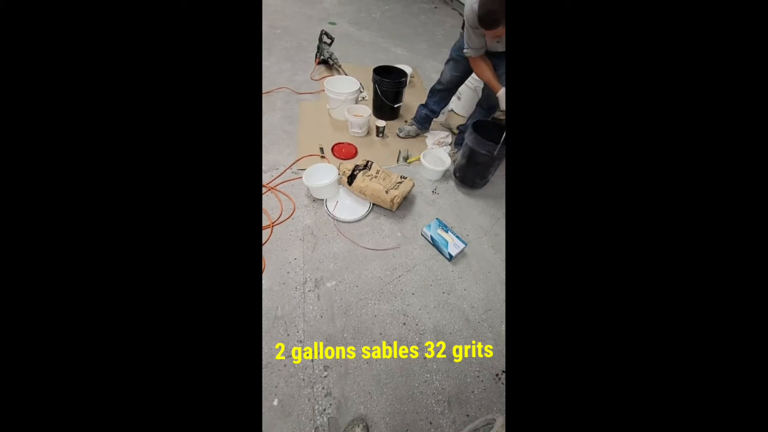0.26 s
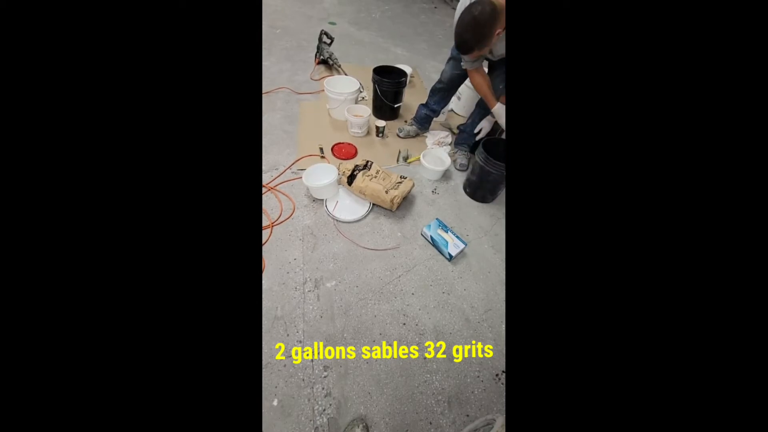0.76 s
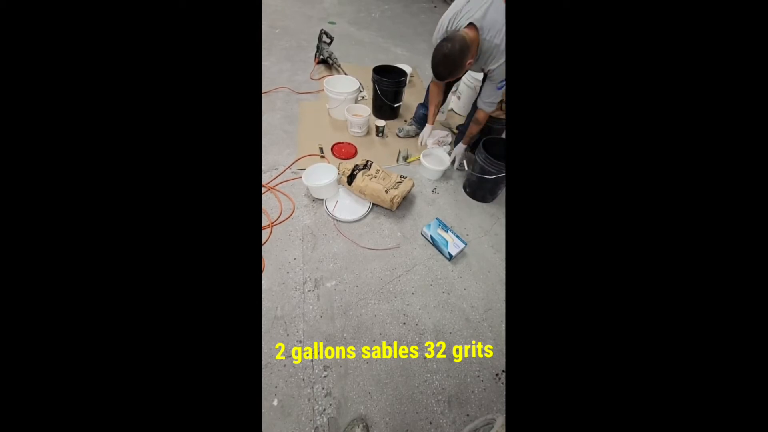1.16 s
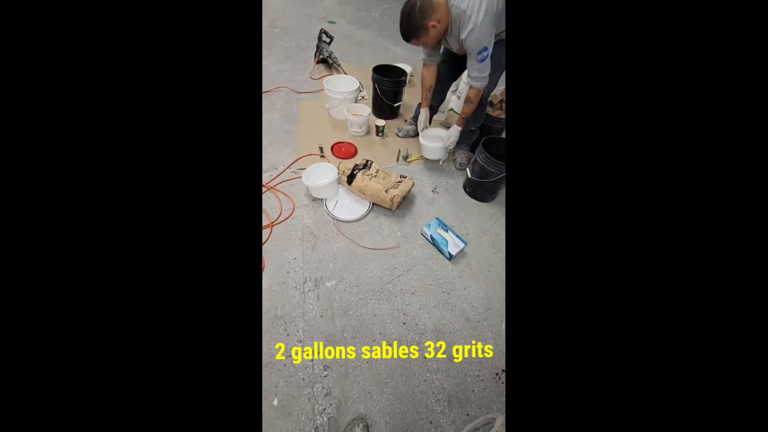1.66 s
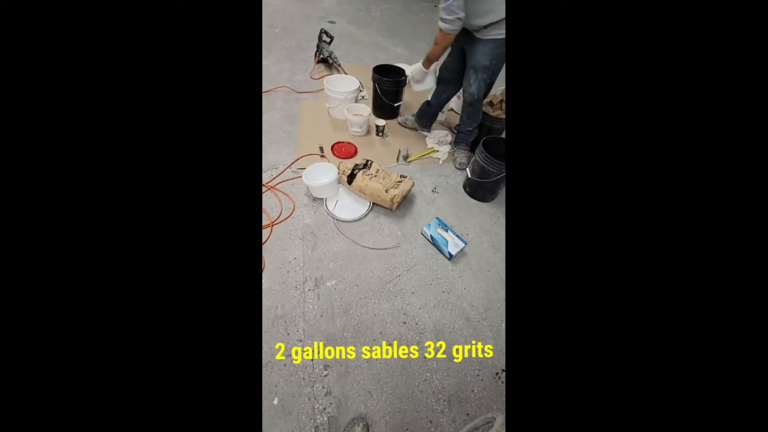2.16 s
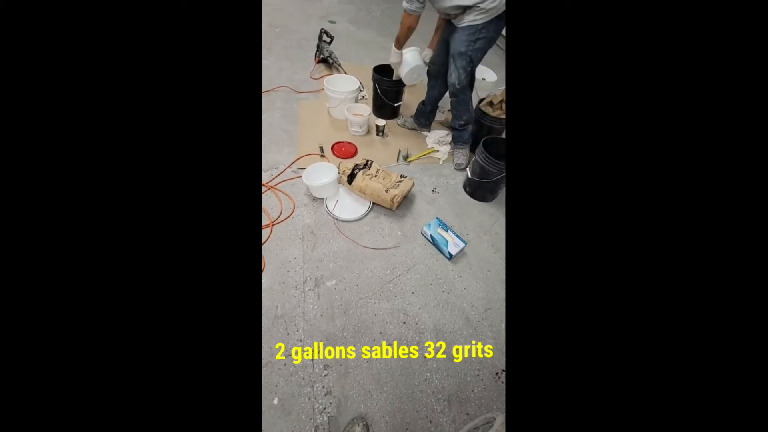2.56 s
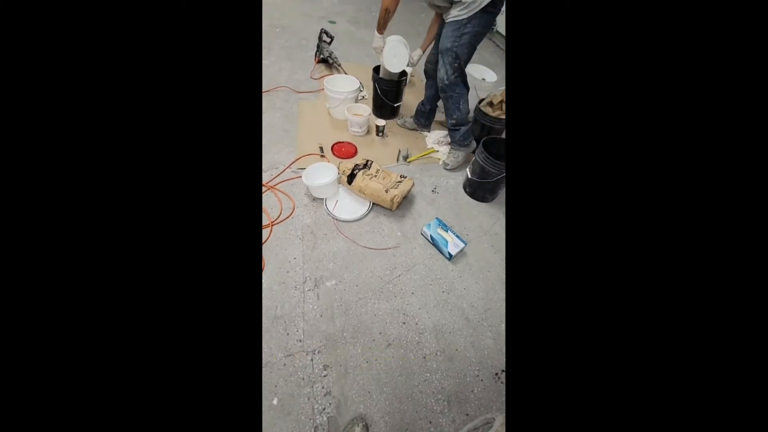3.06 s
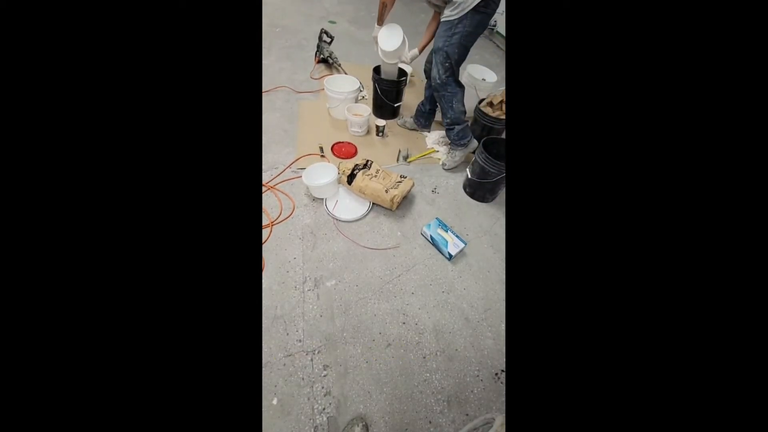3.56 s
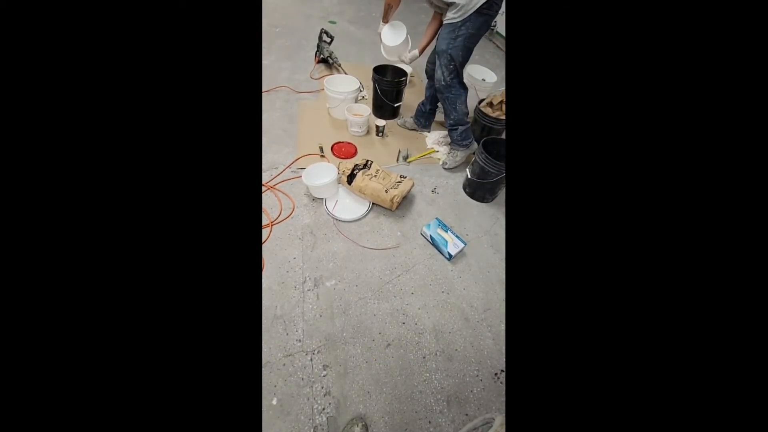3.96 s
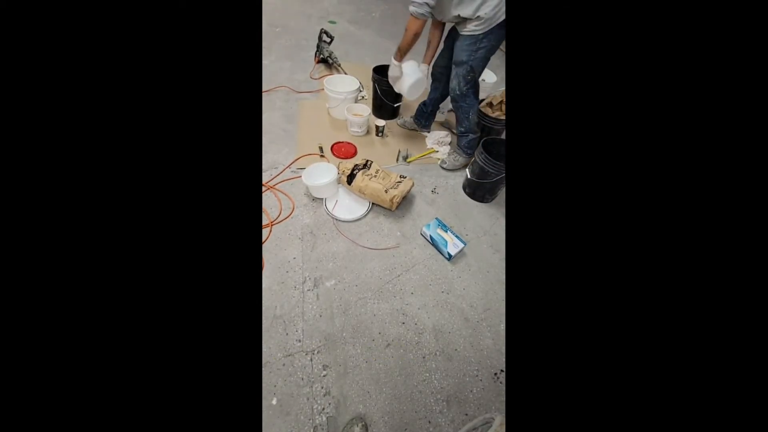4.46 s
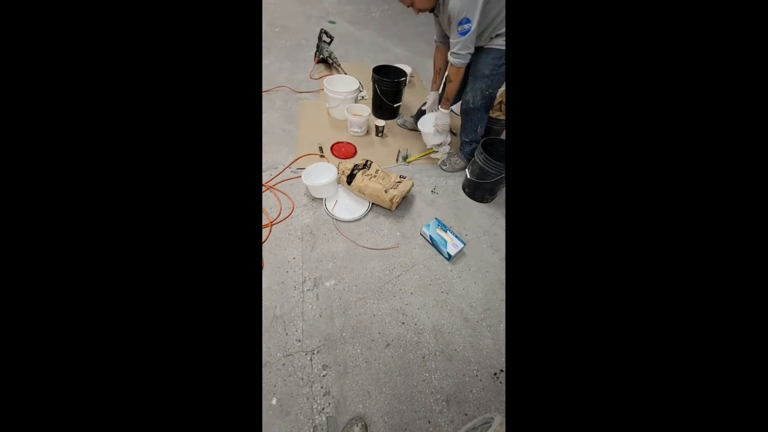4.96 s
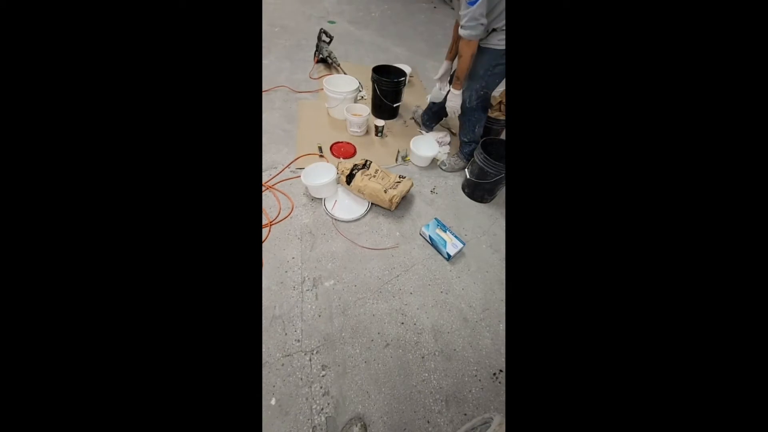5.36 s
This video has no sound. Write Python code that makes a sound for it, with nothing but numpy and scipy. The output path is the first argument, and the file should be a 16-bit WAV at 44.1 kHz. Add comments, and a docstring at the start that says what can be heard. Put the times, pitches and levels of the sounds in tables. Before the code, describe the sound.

In a reverberant concrete garage with low rumble and faint lamp hum, feet and plastic scuff, a heavy bucket thumps down and rocks, and its handle clacks several times. After a brief scrape, dry sand hisses into a tall bucket in two surges. A quiet gap follows, then the empty pail clatters onto the floor. Stereo microphones at a distance hear mostly room.

```python
"""In a large concrete garage a heavy plastic bucket is set down and its handle clacks on the rim.
A small pail of dry sand is tipped into a tall bucket in two surges and dropped on the floor; shoes step and scuff.
Blows excite resonant modes, sand and scrapes are streams of random tiny impacts, and lamps hum over a low rumble.
Two spaced microphones hear mostly the room: direct sound, a few strong echoes and a dense diffuse tail."""
import sys
import numpy as np
from scipy import signal
from scipy.fft import rfft, irfft
from scipy.io import wavfile
from scipy.ndimage import uniform_filter1d

SR = 44100
rng = np.random.default_rng(int(sys.argv[2]) if len(sys.argv) > 2 else 0)


def wrap_up_sound(samples):
    """Save the sound to the file named by the first command line argument, as 16-bit audio."""
    columns = np.atleast_2d(samples).T
    # keep every value between -1 and 1, then stretch to whole-number steps
    tamed = np.clip(columns, -1, 1)
    steps = np.round(tamed * 32767).astype(np.int16)
    wavfile.write(sys.argv[1], SR, steps)


N = 247753

# Source levels are those before the room and the left-right balance.
# Blows: (time [s], ring level [dB], crack level over the ring [dB], hardness [dB per octave])
BUCKET_THUMPS = [(0.563, 9, -37.5, -0.5), (0.573, 8.5, -41.5, -5), (0.73, 6.5, -33.5, -10.5),
                 (0.806, 4, -44, -4)]  # the heavy bucket meets the floor and rocks
HANDLE_CLACKS = [(0.722, -33, -11, 4.5), (0.8215, -6, -11.5, -5), (1.1397, 7.5, -11.5, -1.3),
                 (1.4274, 0.5, -10, -2.5), (1.5946, -10.5, -10, -3.3), (1.6828, -27, -3, -7),
                 (1.9294, -37.5, -2.5, 14)]  # the handle and rim knock
PAIL_BOUNCES = [(5.134, -25.5, -22, 20), (5.146, -9.5, -11.5, -3.5), (5.151, -1, -7.5, 7.5),
                (5.163, 5, -1.5, -2), (5.254, 4.5, -21, 2), (5.266, -4, -24, -1), (5.33, -16, -30, -3),
                (5.39, -10, -19, 6), (5.525, -27, -10, 15)]  # the empty pail lands and bounces
FOOTFALLS = [(0.174, -11, -41, 4), (0.203, -19, -32, -3), (2.276, -18, -21, -1)]  # soft footfalls on the concrete
# Ticks and short knocks of the pail:
# (time [s], level [dB], pitch [Hz], click level over the ring [dB], cycles to fall 60 dB [count])
PAIL_TICKS = [(2.588, -49.5, 2000, -24, 9.9), (2.647, -44, 1200, -6, 16), (2.762, -50, 2280, -35, 9.4),
              (2.821, -37.5, 750, -2, 19), (3.5, -33, 2500, -30, 6.7), (4.06, -56.5, 6050, 6, 14),
              (4.165, -49, 1443, 3, 13), (4.222, -49, 3860, -11, 25), (4.344, -46, 3450, -12, 16),
              (4.347, -59, 1170, -20, 50), (5.2555, -15, 602, -31, 10.3)]
# The loaded bottom of the bucket booms as the weight settles: (time [s], swell [s], peak level [dB])
BUCKET_BOOMS = [(0.5653, 0.021, -4), (.728, .012, -20), (0.8166, 0.0057, -13.5)]
BOOM_HZ, BOOM_DECAY_S = 233, 0.0086

# Resonant modes of each body: (frequency [Hz], width [Hz], relative level [dB])
BUCKET_MODES = [(102, 24, -12), (198, 29, -0.5), (220, 50, 3), (262, 160, 2), (368.5, 100, -10),
                (531, 150, -13.5), (715, 77, -22.5), (1039, 364, -6), (1567, 136, -14), (1985, 200, -28.5)]
HANDLE_MODES = [(196.6, 120, -12), (497.5, 840, -5), (774, 81, -2), (1077, 180, 2.5), (1354, 200, 3),
                (1763, 960, -1), (2300, 380, -5.5), (2630, 150, 3.5), (2960, 170, 0), (2928, 182, 7.5),
                (3070, 160, -1)]
PAIL_MODES = [(98, 27.8, -5.5), (180, 32, -9), (290, 30, -6), (356.3, 23, 8), (508, 35, 1), (705, 300, -13),
              (1120, 190, -14.5), (1710, 260, -28), (1960, 160, -41), (2670, 990, -31.5)]
SHOE_MODES = [(106.9, 61, -12), (211, 40, 1), (344.7, 150, -5), (478, 300, -7), (652.6, 140, -11.5),
              (1600, 1700, -27.5)]
HOLLOW_MODES = [(725, 190, -0.5), (595, 220, -10), (1330, 40, -8)]  # the hollow of the tipped pail
# Spectra of contact cracks and rubbed sounds: (frequency [Hz], relative level [dB per Hz])
BUCKET_CRACK = [(2000, -12), (3500, 3), (4300, -3.5), (6200, -8), (8000, -6.5), (10500, -7), (12500, -5.5),
                (14000, -3.5), (15500, -16.5)]  # heavy bucket and handle
PAIL_CRACK = [(880, -23), (1500, -1), (1880, 1), (2670, -7.5), (2920, -10), (6190, -10), (8790, -16.5),
              (12300, -16.5), (15500, -22)]  # pail and shoe soles
SAND_COLOUR = [(350, -31), (600, -7), (678, -26), (756, -10.5), (915, -16.5), (1180, -4.5), (1430, -8),
               (2680, -1), (3380, -2), (5220, -6.5), (6950, -9.5), (10400, -20.5), (13200, -15),
               (15500, -18)]
SCRAPE_COLOUR = [(120, -57.5), (200, -3.5), (242, -34), (265, -20.5), (367, -16), (461, -5.5), (700, -6.5),
                 (1590, -3), (5000, -90), (6500, -94), (11000, -120)]

# The stream from the tipped pail, two surges: (time [s], level [dB], fizz level over the flow [dB])
POUR = [(2.56, -71, -3), (2.64, -69.5, 11), (2.79, -65.5, 7.5), (2.85, -54, 5), (2.92, -51, 5),
        (3.08, -54, 3.5), (3.33, -58.5, 3), (3.46, -53.5, 3.5), (3.51, -49.5, 1.5), (3.76, -57.5, 4.5),
        (3.95, -98, 6)]
# Loose grains spill: (start [s], hold [s], level [dB], fizz level over the flow [dB])
SPILLS = [(0.0, .15, -60, 4.5), (0.164, 0.0071, -55.5, 7.5), (.3, .1, -83, 9), (1.954, 0.16, -67.5, 3),
          (2.323, 0.34, -72.5, 2), (4.048, 0.11, -76, -1), (4.226, 0.007, -72.5, -14),
          (4.34, 0.014, -73, -13), (4.46, 0.069, -76.5, -11.5)]
SPILL_RISE_S, SPILL_FALL_DB_PER_S = 0.011, 400.5
# Sand slips in the hollow of the tipped pail: (start [s], hold [s], level [dB])
SLIPS = [(2.68, 0.012, -55), (2.755, 0.0099, -52.5), (2.82, .03, -53.5), (2.93, 0.05, -56.5),
         (3.82, .02, -62.5), (4.69, 0.1, -65.5), (4.88, 0.11, -68)]
SLIP_RISE_S, SLIP_FALL_DB_PER_S = 0.12, 206
# Plastic and shoes scrape the floor: (start [s], hold [s], level [dB])
SCRAPES = [(0.0, 0.18, -59.5), (.175, .008, -52), (.28, 0.029, -71), (1.6, 0.037, -37.5),
           (1.685, 0.055, -55), (2.05, 0.21, -66.5), (4.0, 0.097, -73), (4.155, .04, -83),
           (4.7, 0.27, -78.5), (5.145, .005, -43)]
SCRAPE_RISE_S, SCRAPE_FALL_DB_PER_S = 0.03, 255.5

# Extra top octave carried by the direct path alone: one row per port, left then right (level [dB])
BEAM_DB = [
    [5.0],
    [-8.0],
]
# Early echoes from floor, ceiling and walls: (delay [s], relative level [dB])
ECHOES = [(.0055, -3.5), (0.0126, 3.5), (.01356, -3), (0.0226, 2), (0.026, -12), (0.037, -7)]
# Decay of the diffuse tail: (frequency [Hz], time to fall 60 dB [s])
DECAY_TIMES = [(60, 0.76), (250, 1.19), (700, 1.21), (1500, 1), (3000, 0.91), (6000, 0.74), (9000, 0.61),
               (14000, 0.54)]
# Colour of the diffuse tail: (frequency [Hz], relative level [dB])
TAIL_COLOUR = [(60, -1), (250, 0.5), (700, 3), (1500, 2.1), (3000, 1), (6000, 2.5), (9000, -3.5),
               (12000, -6)]
# Left-right likeness of diffuse sound: (frequency [Hz], correlation [-1 to 1])
LIKENESS = [(60, 1), (120, 1), (240, 0.85), (480, -0.19), (950, -0.41), (1890, -0.28), (3770, -0.045),
            (7520, 0.13), (15000, -0.18)]
RIGHT_LAG_S = 0.00034  # the right port hears direct sound and echoes later

# Hum of the lamps: (frequency [Hz], mean level before waver and balance [dB rms])
LAMP_HUM = [(120, -69.5), (240, -60), (360, -68), (480, -76)]
# Rumble and hiss of the building: (frequency [Hz], relative level [dB per Hz])
AIR_COLOUR = [(12, -57), (20, -6.5), (112, 4.5), (185, -10.5), (238, -5), (289, -10), (362, -7.5),
              (416, -11.5), (1500, -25.5), (2840, -28.5), (10500, -44.5), (13900, -38.5), (15500, -53.5)]
AIR_DB = -54  # rms level before the left-right balance
BAND_EDGE_HZ = 15500


def sand():
    """Granular flow: landing, sliding and scraping impacts add as independent random sources."""
    hz, t = np.fft.rfftfreq(N, 1 / SR), np.arange(N) / SR
    return landing_sand(hz, t) + sliding_sand(hz, t) + scraping(hz, t)


def landing_sand(hz, t):
    """Superposed impacts: countless grains land in uneven lumps, the finest fizzing in the top octave."""
    colour = gain_of(read(SAND_COLOUR, hz))
    top = 1 / (1 + (8500 / (hz + 1)) ** 6)
    coarse_db, fizz_db = flow_db(t, 0), flow_db(t, 1)
    noise = rng.standard_normal(N)
    lumps_db = 1.5 * evened(uniform_filter1d(uniform_filter1d(noise, size=900), size=900))
    coarse = rubbed(colour * (1 - top), coarse_db + lumps_db, per_s=20000, spread_db=3)
    fizz = rubbed(colour * top, fizz_db, per_s=29000, spread_db=2.9)
    return coarse + fizz


def flow_db(t, fizz_share):
    """Flow envelope: the stronger of pour and spills sets the level; fizz_share 1 adds the fizz offset."""
    when, pour_db, fizz_db = np.transpose(POUR)
    pour = np.interp(t, when, pour_db + fizz_share * fizz_db, -120, -120)
    strokes = [(s, hold, db + fizz_share * fizz) for s, hold, db, fizz in SPILLS]
    return np.maximum(pour, strokes_db(strokes, t, SPILL_RISE_S, SPILL_FALL_DB_PER_S))


def sliding_sand(hz, t):
    """Cavity resonance: slipping grains excite the modes of the tipped pail's hollow."""
    level_db = strokes_db(SLIPS, t, SLIP_RISE_S, SLIP_FALL_DB_PER_S)
    return rubbed(modes(HOLLOW_MODES, hz), level_db, per_s=3000, spread_db=3)


def scraping(hz, t):
    """Friction as a train of micro-impacts: plastic and shoes rub over the floor."""
    level_db = strokes_db(SCRAPES, t, SCRAPE_RISE_S, SCRAPE_FALL_DB_PER_S)
    return rubbed(gain_of(read(SCRAPE_COLOUR, hz)), level_db, per_s=3200, spread_db=3)


def rubbed(response, level_db, per_s, spread_db):
    """Filtered impulse noise: random grains take the colour of a response and follow a level curve."""
    coloured = irfft(rfft(grains(per_s, spread_db)) * response, N)
    return gain_of(level_db) * evened(coloured)


def grains(per_s, spread_db):
    """Shot noise: tiny impacts of random sign at random moments, a few larger than the rest."""
    size = gain_of(spread_db * np.minimum(rng.exponential(1, N), 4))
    sign = rng.choice([-1., 1.], N)
    return size * sign * (rng.random(N) < per_s / SR)


def strokes_db(rows, t, rise_s, fall_db_per_s):
    """Stroke envelope: each climbs 30 dB in its rise time, holds, then fades; the loudest one leads."""
    levels = []
    for s, hold, db in rows:
        rise = 30 * np.maximum(s - t, 0) / rise_s
        fall = fall_db_per_s * np.maximum(t - s - hold, 0)
        levels.append(db - rise - fall)
    return np.max(levels, axis=0)


def bucket():
    """Impact and forced response: the heavy bucket thumps and its loaded bottom booms."""
    thumps = garage(blows(BUCKET_THUMPS, BUCKET_MODES, BUCKET_CRACK), 6.05, -11.0, -1.06)
    return thumps + garage(booms(), -9.0, -29, -0.68)


def booms():
    """Transient low tone: it swells while the load presses down and is choked by the floor."""
    out, t = np.zeros(N), np.arange(3000) / SR
    for s, swell, db in BUCKET_BOOMS:
        envelope = np.minimum(t / swell, 1) * np.exp(-np.maximum(t - swell, 0) / BOOM_DECAY_S)
        add(out, s, gain_of(db) * envelope * np.sin(2 * np.pi * BOOM_HZ * t))
    return out


def handle():
    """Modal impact: the handle knocks on the rim and rings its own modes."""
    return garage(blows(HANDLE_CLACKS, HANDLE_MODES, BUCKET_CRACK), 10.77, 1.7, .1)


def pail():
    """Modal impact of a light shell: the pail bounces and ticks."""
    return garage(blows(PAIL_BOUNCES, PAIL_MODES, PAIL_CRACK) + ticks(), 6.33, -3.5, -0.69)


def ticks():
    """Damped oscillation: short dull rings of thin plastic, each begun by a click."""
    out, t = np.zeros(N), np.arange(4000) / SR
    for s, db, hz, click_db, cycles in PAIL_TICKS:
        ring = gain_of(-60 * t * hz / cycles) * np.sin(2 * np.pi * hz * t)
        click = gain_of(click_db - 60 * t / 0.003) * rng.standard_normal(len(t))  # falls 60 dB in 3 ms
        add(out, s, gain_of(db) * (ring + click))
    return out


def footsteps():
    """Modal impact, heavily damped: soft footfalls thud on the concrete."""
    return garage(blows(FOOTFALLS, SHOE_MODES, PAIL_CRACK), 7.4, 0, -1.2)


def blows(events, body, crack):
    """Modal excitation: each blow cracks briefly and rings the body; hard blows favour the high modes."""
    out, hz, t = np.zeros(N), np.fft.rfftfreq(8192, 1 / SR), np.arange(8192) / SR
    crack_colour = evened(gain_of(read(crack, hz)))
    for s, db, crack_db, hardness_db in events:
        struck = [(f, w, d + hardness_db * np.log2(f / 500) + 1.9 * rng.standard_normal())
                  for f, w, d in body]
        ring = causal(evened(modes(struck, hz)))
        rough = rfft(t * np.exp(-t / 0.0014) * rng.standard_normal(len(t)))
        rough /= np.sqrt(uniform_filter1d(abs(rough) ** 2, size=25))  # keeps the colour from blow to blow
        add(out, s, gain_of(db + crack_db) * irfft(rough * crack_colour)[:1000])
        add(out, s + .0018, gain_of(db) * ring)  # the ring follows the crack by 1.8 ms
    return out


def modes(table, hz):
    """Resonance: the gain of a body is its modes added by power, weak in the deep bass."""
    power = sum((gain_of(db) / (1 + (2 * (hz - f) / w) ** 2) ** 0.85) ** 2 for f, w, db in table)
    return np.sqrt(power) / (1 + (70 / (hz + 1)) ** 2)


def causal(gain):
    """Minimum phase: the impulse response that starts at once and has this gain."""
    both_sides = np.concatenate([gain, gain[-2:0:-1]])
    log_gain = np.log(both_sides + 1e-5 * gain.max())
    return np.fft.ifft(np.exp(np.conj(signal.hilbert(log_gain)))).real[:len(gain)]


def garage(x, tail_db, echo_db, left_db):
    """Room superposition: direct sound, echoes, tail, and a top octave beamed more at the left port."""
    highpass = signal.butter(4, 9000, "high", fs=SR, output="sos")
    beam = gain_of(BEAM_DB) * signal.sosfilt(highpass, x)
    reverberation = gain_of(tail_db) * through(x, tail())
    return (through(x, paths(echo_db)) + beam + reverberation) * gain_of([[left_db], [-left_db]])


def moving(x, count):
    """Time-varying coupling: a spread, shifting source feeds the tail along ever-changing paths."""
    turn = np.arange(N) / SR * 2.5  # half cycles
    wet = sum(through(x * np.cos(np.pi * (turn + k / count)), tail()) for k in range(count))
    wet *= np.sqrt(2 / count)
    return (through(x, paths(-16.5)) + gain_of(4.0) * wet) * gain_of([[-.9], [.9]])


def paths(echo_db):
    """Specular reflection: direct sound and a few strong dull echoes reach the right port later."""
    ports = np.array([0, round(RIGHT_LAG_S * SR)])
    direct, echoes = np.zeros((2, 2000)), np.zeros((2, 2000))
    direct[[0, 1], ports] = 1
    for s, db in ECHOES:
        echoes[[0, 1], round(s * SR) + ports] += gain_of(db + echo_db)
    return direct + signal.lfilter([.45], [1, -.55], echoes)  # walls swallow the treble


def tail():
    """Diffuse reverberation: dense noise builds up and dies band by band, with an even colour."""
    room = noise_pair(frames=700, size=512, shape=lambda hz, t: gain_of(-60 * t / read(DECAY_TIMES, hz)))
    room *= np.clip(np.arange(room.shape[1]) / SR / 0.0022, 0, 1)  # builds up in 2.2 ms
    spectrum, hz = rfft(room), np.fft.rfftfreq(room.shape[1], 1 / SR)
    spectrum /= np.sqrt(uniform_filter1d((abs(spectrum) ** 2).mean(0), size=80))
    return irfft(spectrum * gain_of(read(TAIL_COLOUR, hz)))[:, :SR * 3 // 2]


def noise_pair(frames, size, shape):
    """Diffuse field: two partly correlated channels of noise with magnitude shape(hz, t)."""
    hz, t = np.fft.rfftfreq(size, 1 / SR), np.arange(frames) * size / 4 / SR
    a, b, c, d = rng.standard_normal((frames, len(hz), 4)).T
    same = np.clip(read(LIKENESS, hz), -1, 1)[:, None]
    left = a + 1j * b
    right = same * left + np.sqrt(1 - same ** 2) * (c + 1j * d)
    z = np.array([left, right]) * shape(hz[:, None], t)
    return signal.istft(z, nperseg=size, noverlap=size * 3 // 4)[1]


def through(x, response):
    """Linear system: the source is convolved with the response at each port."""
    return signal.fftconvolve(x[None], response, axes=1)[:, :N]


def building():
    """Background field: diffuse rumble and hiss join the hum of the lamps."""
    return gain_of(AIR_DB) * evened(air()) + lamps()


def air():
    """Broadband noise: steady rumble and hiss whose spectrum drifts in patches."""
    def shape(hz, t):
        """Spectral magnitude with patches of 1.8 dB rms."""
        patches = rng.standard_normal((len(t), len(hz))).T
        patches = evened(uniform_filter1d(uniform_filter1d(patches, 8, 0), 10, 1))
        return gain_of(read(AIR_COLOUR, hz) + 1.8 * patches)
    return noise_pair(frames=N // 512 + 5, size=2048, shape=shape)[:, :N]


def lamps():
    """Harmonic series: sines at fixed frequencies, each wavering slowly in level."""
    hum, t = np.zeros(N), np.arange(N) / SR
    for hz, db in LAMP_HUM:
        waver = evened(uniform_filter1d(uniform_filter1d(rng.standard_normal(N), 3000), 3000))
        tone = np.sin(2 * np.pi * (hz * t + rng.random()))
        hum += np.sqrt(2) * gain_of(db + 0.64 * waver) * tone
    return hum


def gain_of(db):
    """Level law: decibels to amplitude ratio."""
    return 10 ** (np.asarray(db) / 20)


def evened(x):
    """Normalization: scale to unit rms."""
    return x / np.sqrt(np.mean(x ** 2) + 1e-20)


def read(points, hz):
    """Logarithmic frequency scale: interpolate a table along log frequency."""
    f, value = np.transpose(points)
    return np.interp(np.log(hz + 1), np.log(f + 1), value)


def add(mix, s, sound):
    """Superposition: add a sound into the mix from time s [s]."""
    part = mix[round(s * SR):][:len(sound)]
    part += sound[:len(part)]


def scene():
    """Superposition of all sources at the two ports."""
    near = moving(sand(), count=4) + bucket() + handle() + pail() + footsteps()
    return near + building() * gain_of([[-1.2], [1.2]])


def record(dry):
    """Saturation and band limit: the input stage rounds off the highest peaks, then a low-pass acts."""
    rounded = dry / (1 + abs(dry / .95) ** 4) ** .25
    lowpass = signal.firwin(511, BAND_EDGE_HZ, window=("kaiser", 9), fs=SR)
    return signal.oaconvolve(rounded, lowpass[None], "same")


dry = scene()
out = record(dry)
wrap_up_sound(out)
```